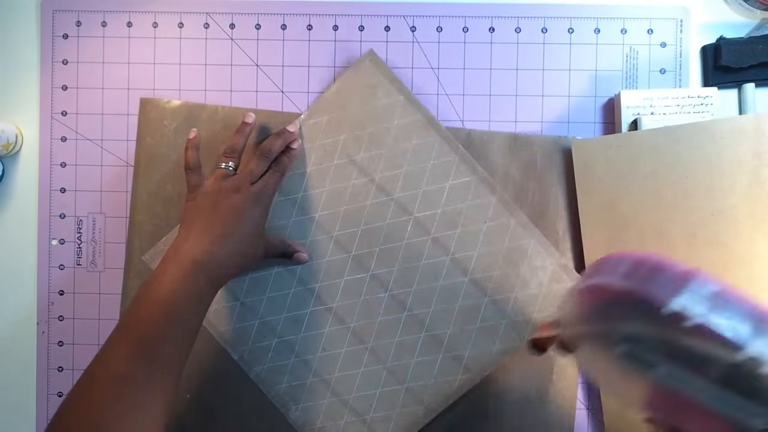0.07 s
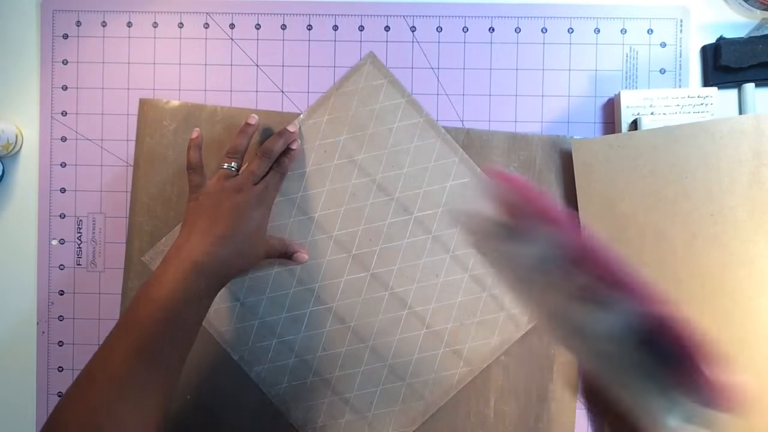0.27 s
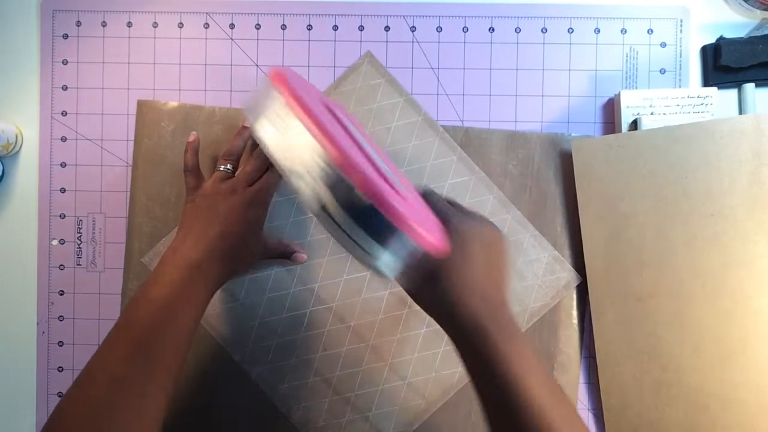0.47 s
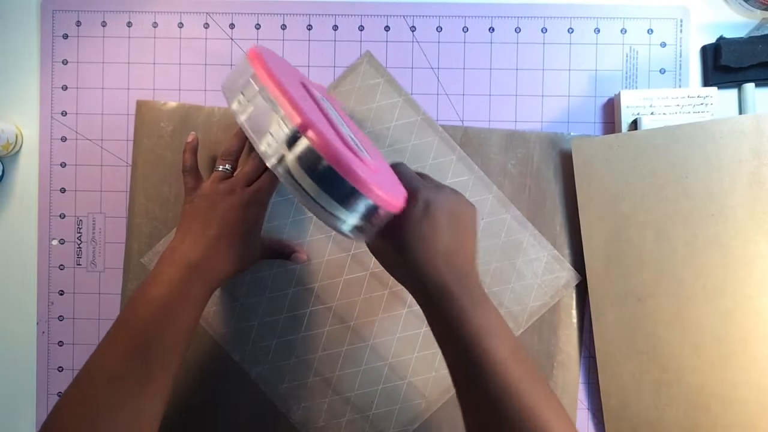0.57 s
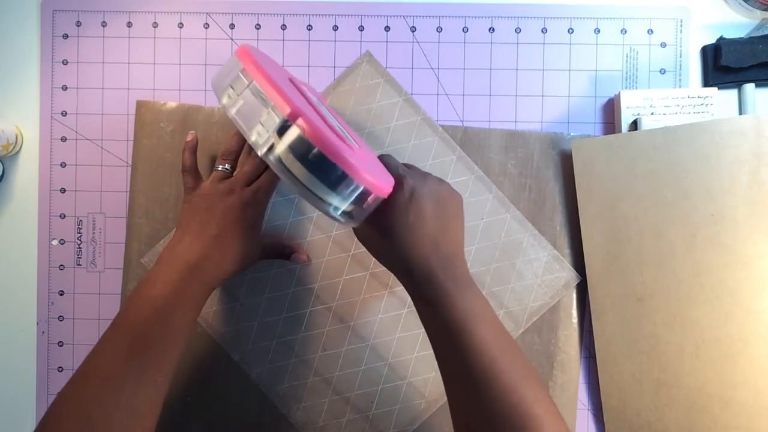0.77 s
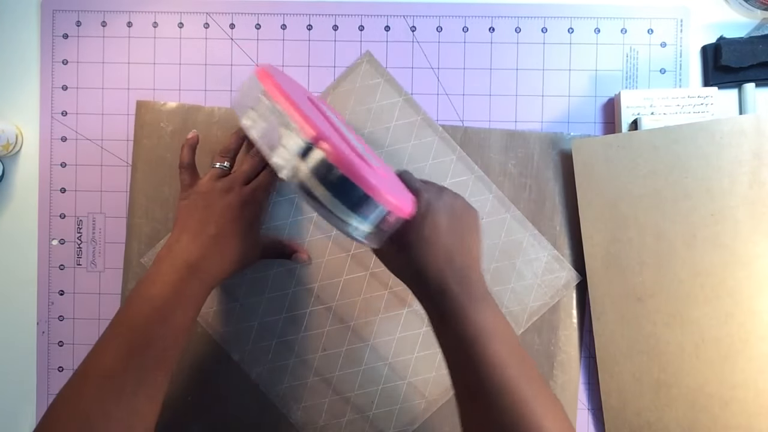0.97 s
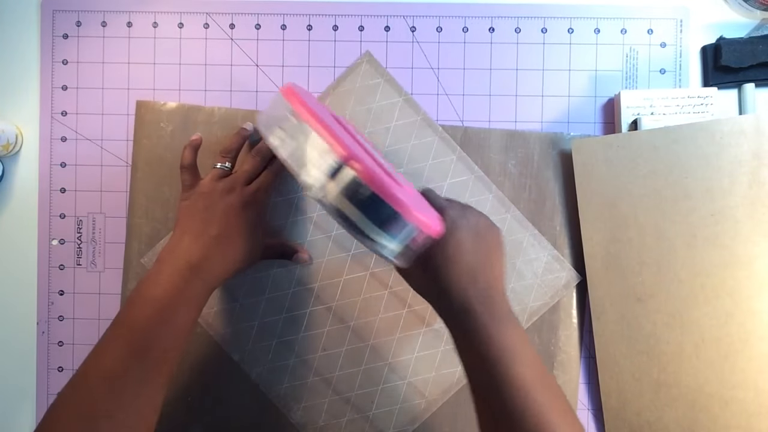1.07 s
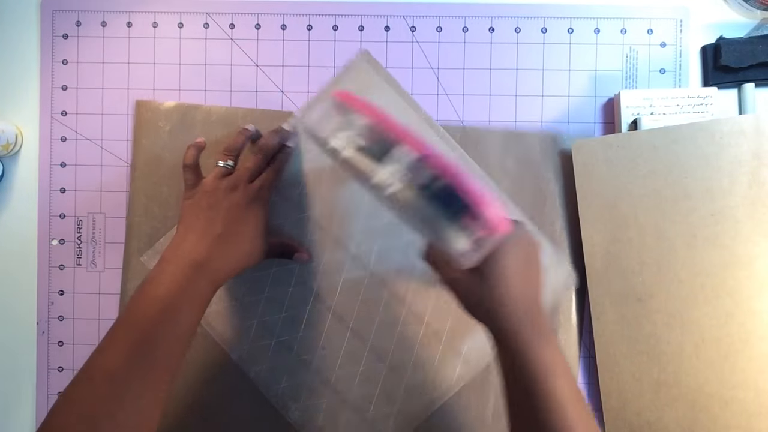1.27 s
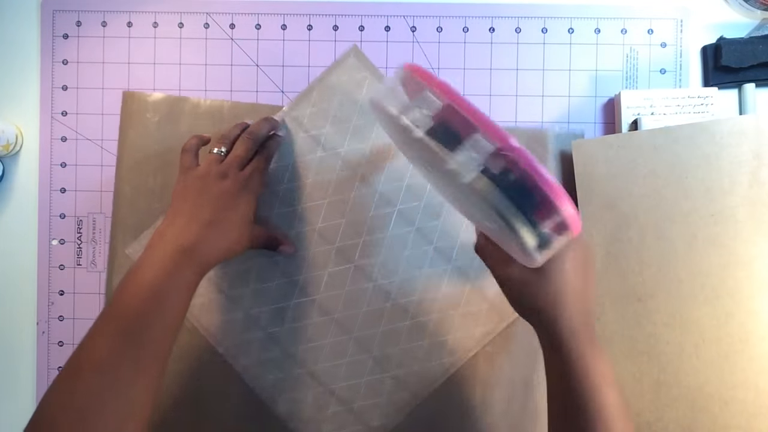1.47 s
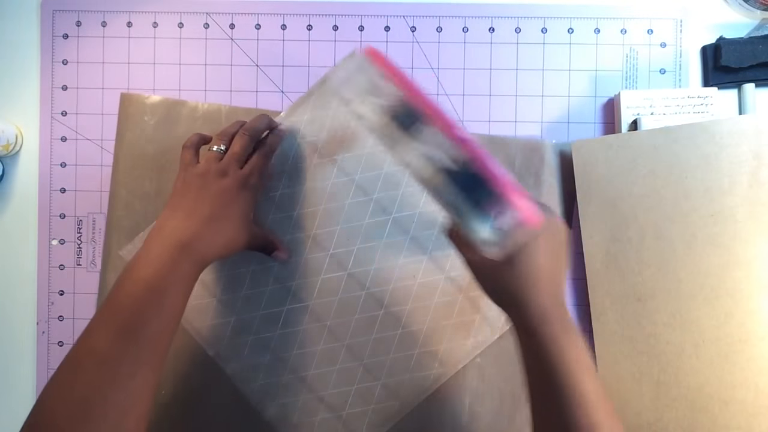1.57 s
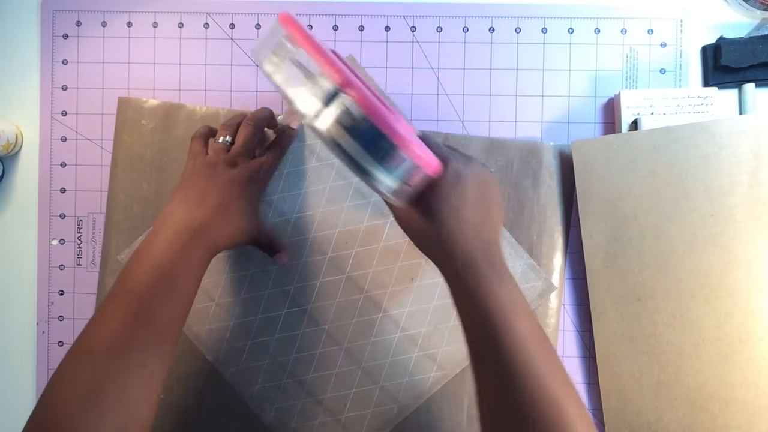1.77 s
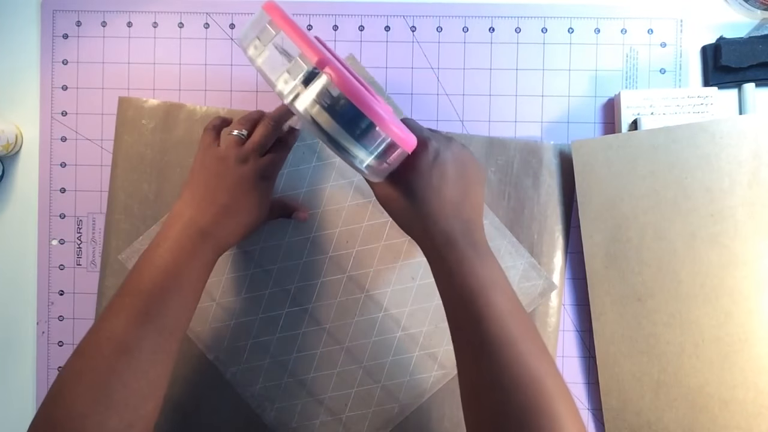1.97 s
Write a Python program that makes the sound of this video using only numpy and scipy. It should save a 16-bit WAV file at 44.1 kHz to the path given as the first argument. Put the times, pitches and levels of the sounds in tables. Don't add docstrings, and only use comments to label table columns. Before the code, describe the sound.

A handheld plastic tape runner gives one loud hollow clack, then smaller taps and a low knock on the mat, a soft papery scrape with faint tape hiss, and a sharp tick; close, small quiet room.

```python
import sys
import numpy as np
from scipy import signal
from scipy.fft import rfft, irfft
from scipy.io import wavfile
from scipy.ndimage import uniform_filter1d

SR = 44100
rng = np.random.default_rng(int(sys.argv[2]) if len(sys.argv) > 2 else 0)


def output_pcm(signal):
    pcm = np.clip(np.atleast_2d(signal).T, -1, 1) * 32767
    wavfile.write(sys.argv[1], SR, np.round(pcm).astype(np.int16))


def nominal_scale(level):
    x = np.asarray(level, float) / 20
    return 10 ** x


N = 89390


def unit(x):
    return x / np.sqrt(np.mean(x ** 2))


def on_log(hz, table):
    table = np.array(table, float)
    return np.interp(np.log(np.maximum(hz, 1)), np.log(table[:, 0]), table[:, 1])


def colour(x, table):
    hz = np.fft.rfftfreq(len(x), 1 / SR)
    return unit(irfft(rfft(x) * nominal_scale(on_log(hz, table)), len(x)))


def band(x, hz, width):
    return signal.lfilter(*signal.iirpeak(min(hz, SR / 2.2), hz / width, fs=SR), x)


def cut(x, hz, kind, order=4):
    sos = signal.butter(order, min(hz, SR / 2.2), kind, fs=SR, output="sos")
    return signal.sosfilt(sos, x)


def walk(rate):
    hold = int(SR / rate)
    steps = np.repeat(rng.standard_normal(N // hold + 1), hold)
    return unit(uniform_filter1d(steps, hold)[:N])


def grit(size, spread_db):
    return unit(rng.standard_normal(size) * nominal_scale(spread_db * rng.exponential(size=size)))


def add(out, at_s, x):
    i = max(int(at_s * SR), 0)
    out[i:i + len(x)] += x[:N - i]


def contacts(rows, shell_db, width=1.0, reach_up=2.86):
    # frequency in Hz, level in dB, 60 dB decay time in s.
    shell_modes = np.array([(235, -38, 0.14), (533, -12.5, 0.18), (706.6, -6, 0.16), (1132, -4.5, 0.032),
                            (1209, 1, 0.016), (1653.4, -5.5, 0.086), (2004, 0, 0.03), (2330, -15.5, 0.024),
                            (2460, -7.5, 0.043), (2892, -12, 0.17), (3644, -8, 0.062), (4220, 5.5, .035),
                            (4203, -13, 0.018), (6821, -20, .015)])
    mode_hz, mode_db, mode_t60 = shell_modes[:, 0], shell_modes[:, 1], shell_modes[:, 2:]
    mode_scatter_db, attack_share, grit_db = 0.5, 0.15, 2.2
    out, t = np.zeros(N), np.arange(SR // 4) / SR
    for at, db, hz, length, treble_db in rows:
        length = max(length, 2e-4)
        rise = (1 - np.exp(-t / (attack_share * length))) ** 2
        push = grit(len(t), grit_db) * rise * np.exp(-(t / length) ** 1.03)

        chance = rng.standard_normal((len(shell_modes), 3))
        f = mode_hz * (1 + 0.00088 * chance[:, 0])
        reach = 1 / (1 + ((f / hz - hz / f) / 2.08) ** 2)
        gains = reach * nominal_scale(mode_db + mode_scatter_db * chance[:, 1])
        waves = np.sin(2 * np.pi * (np.outer(f, t) + chance[:, 2:]))
        ring = gains @ (waves * np.exp(-np.log(1000) * t / mode_t60))

        body = 2.04 * band(push, hz, width * hz) + nominal_scale(shell_db) * ring * rise
        fizz = cut(cut(push, 4250, "high", order=2), 9500, "low", order=1)
        crack = cut(body, reach_up * hz, "low") + nominal_scale(treble_db) * fizz
        add(out, at, nominal_scale(db) * cut(crack, 181.3, "high", order=2))
    return out


def clacks():
    # start in seconds, level in dB, colour in Hz, chatter length in s, treble in dB.
    free_contacts = [(.012, -43, 776, 0.003, -28), (.0305, -43.5, 1860, 0.0058, -29),
                     (.1045, -47.5, 2550, 0.0046, -2), (.1135, -57, 2600, .003, 10),
                     (.134, -47, 2500, .008, 7), (.1300, -37, 1570, 0.0021, -8.5),
                     (.1415, -30.5, 1760, 0.014, -1), (.1768, -24.5, 2820, 0.0019, 2.5),
                     (.1795, -11.5, 1520, 0.007, -3.5), (.334, -54.5, 8100, 0.015, -5),
                     (.441, -42, 1680, 0.0072, -5), (.7072, -52.5, 895, 0.003, -22),
                     (.61, -73.5, 5000, 0.044, 11), (.807, -59.5, 1960, 0.053, -5.5)]
    return contacts(free_contacts, shell_db=-7)


def pressed():
    # start in seconds, level in dB, colour in Hz, chatter length in s, treble in dB.
    damped_contacts = [(.462, -36, 970, 0.0079, -25), (.470, -48, 1690, 0.012, -23),
                       (.482, -36, 797, 0.0088, -33), (.896, -41, 2300, 0.0034, -16),
                       (.905, -28.5, 1200, 0.012, -23), (.912, -45.5, 3700, 0.022, -7),
                       (.934, -32.5, 900, 0.011, -32), (.950, -46.5, 2170, 0.013, -36),
                       (.964, -31.5, 640, 0.007, -30), (1.162, -45.5, 2190, 0.012, -23),
                       (1.300, -44, 1200, 0.003, -24), (1.3202, -36, 780, 0.0067, -5),
                       (1.371, -46, 3100, 0.004, 4), (1.607, -51, 2700, 0.0015, -20),
                       (1.750, -41, 426, 0.018, -9), (1.852, -48, 1500, 0.024, -23),
                       (1.940, -47, 690, 0.016, -30)]
    return contacts(damped_contacts, shell_db=-11.0)


def hums():
    # start in seconds, level in
    # dB, frequency in Hz, length in s.
    brief_rings = [
        (.158, -43, 690, .022),
        (.1805, -24, 1140, .011),
        (.238, -42.5, 712, .036),
        (.334, -62, 9150, .04),
        (.334, -63, 10400, .035),
        (.4300, -42, 680, .018),
        (1.3205, -38.5, 1610, .008),
                   (0.1426, -36, 1390, 0.0077), (.148, -44, 1340, 0.0036), (0.143, -39, 6850, 0.0053),
             (.148, -44, 4400, .006), (.192, -39, 2930, .012), (0.191, -38.5, 248, 0.022),
             (0.183, -25.5, 740, 0.011), (.4428, -40.5, 1790, 0.0027), (0.442, -51.5, 4160, 0.0045),
             (.444, -47, 666, 0.018), (0.452, -55, 2280, .003), (.4622, -41, 756, 0.0024),
             (0.4634, -49, 690, .004), (0.461, -45, 1630, .005), (.4805, -40, 730, 0.0022),
             (0.4943, -41, 650, 0.0017), (0.901, -59, 4530, 0.0056), (0.908, -40, 1590, 0.0041),
             (.910, -38, 1050, 0.0063), (0.917, -45, 4570, .009), (0.93, -52, 5180, 0.0069),
             (0.917, -39, 954, 0.011), (.920, -45, 3420, 0.013), (.929, -42.5, 1900, 0.007),
             (.931, -38, 978, 0.012), (0.959, -43.5, 680, 0.0099), (1.114, -41.5, 1270, 0.005),
             (1.116, -47.5, 1766, 0.016), (1.168, -48, 1920, 0.0047), (1.194, -46, 1870, 0.0055),
             (1.198, -49, 610, 0.0078), (1.328, -49, 636, 0.0077), (1.384, -47, 620, .01),
             (1.399, -47.5, 1803, 0.015), (1.683, -37.5, 3150, .002), (1.694, -40.5, 3540, 0.0079),
             (.7075, -54, 668, 0.0067), (0.913, -43.5, 400, 0.0099), (0.018, -47, 740, 0.0062),
             (1.7085, -55, 3700, 0.002), (1.713, -47, 3440, 0.0016)]
    out = np.zeros(N)
    for at, db, hz, length in brief_rings:
        t = np.arange(int(length * 2 * SR)) / SR
        swell = 4 * t / length * np.exp(-3 * (t / length) ** 2)
        add(out, at, nominal_scale(db) * swell * np.sin(2 * np.pi * hz * t))
    return out * nominal_scale(2.5 * walk(150))


def snap():
    # start in seconds, level in dB, colour in Hz, chatter length in s, treble in dB.
    crackles = [
        (1.674, -46, 2970, 0.011, -17),
        (1.6848, -28.5, 4270, 0.0054, 7),
        (1.692, -33.5, 3450, 0.005, 6.5),
        (1.702, -42.5, 3560, 0.017, 10),
    ]
    tear_s, tear_db, tear_hz, tear_decay_s = 1.6844, -14.5, 3600, .00015
    out, t = contacts(crackles, shell_db=-25.0, width=0.51), np.arange(SR // 100) / SR
    tick = np.exp(-t / tear_decay_s) * np.cos(2 * np.pi * tear_hz * t)
    add(out, tear_s, nominal_scale(tear_db) * tick)
    return cut(out, 2800, "high")


def patchy(x):
    flicker_db, clump_rate = 1.3, 60
    hz, spec = np.fft.rfftfreq(N, 1 / SR), rfft(x)
    part = np.floor(1.5 * np.log2(np.maximum(hz, 100) / 100))
    common = walk(clump_rate)
    out = np.zeros(N)
    for k in np.unique(part):
        swell = nominal_scale(flicker_db * (walk(clump_rate) + 0.89 * common))
        out += irfft(spec * (part == k), N) * swell
    return unit(out)


def scrape():
    # time in seconds, level in dB, lightness from 0 to 1, tape hiss in dB.
    roller = [(.98, -79, 0, -76), (1.031, -59, 0, -78), (1.076, -50.5, 0, -57), (1.12, -49, 0, -61.5),
              (1.146, -50, 0.05, -59.5), (1.174, -47.5, 0.13, -60), (1.22, -54.5, 0, -58),
              (1.26, -56.5, 0, -59.5), (1.29, -58, 0.13, -67), (1.336, -47.5, 0.03, -66),
              (1.362, -54.5, 0.02, -66), (1.408, -48.5, 0.82, -58), (1.46, -56, 0.96, -65),
              (1.54, -56, 0.95, -69), (1.62, -53, 0.97, -61), (1.675, -57.5, 0.93, -69),
              (1.72, -59, 0.27, -63), (1.8, -84, 0.3, -73)]
    # time in seconds, level in dB.
    shuffle = [
        (0, -57.5),
        (.04, -54),
        (.1, -62),
        (.4, -60),
        (.6, -69.5),
        (1.699, -97.5),
        (1.8, -61),
        (2.03, -71),
    ]
    # frequency in Hz, level in dB per Hz.
    firm_spectrum = [(150, -2.5), (300, -4), (540, 1.5), (1200, -5.5), (1900, -6), (3500, -12),
                     (6000, -19.5), (15500, -32.5)]
    light_spectrum = [(150, -44), (400, -47), (1000, -26.5), (1800, -9), (2700, -7), (4500, -13.5),
                      (8000, -20.5), (15500, -38)]
    tape_spectrum = [(1500, -30), (4000, -23.5), (8000, -6.5), (13000, -7), (15500, -11.5)]
    t = np.arange(N) / SR
    drag_s, drag_db, lightness, hiss_db = np.array(roller).T
    hand_s, hand_db = np.array(shuffle).T

    def grains(spectrum):
        return colour(grit(N, 1.6), spectrum)

    def drag_level(db):
        return nominal_scale(np.interp(t, drag_s, db, left=-120, right=-120))

    heavy, thin = grains(firm_spectrum), grains(light_spectrum)
    rub, hiss = grains(firm_spectrum), grains(tape_spectrum)
    light = np.clip(np.interp(t, drag_s, lightness), 0, 1)
    paper = patchy(np.sqrt(1 - light) * heavy + np.sqrt(light) * thin)
    hand = patchy(rub) + 0.17 * hiss[::-1]
    hand_level = nominal_scale(np.interp(t, hand_s, hand_db))
    return drag_level(drag_db) * paper + drag_level(hiss_db) * hiss + hand_level * hand


def desk():
    # centre in seconds, peak level in dB, frequency in Hz, width in s.
    thumps = [(.02, -54, 170, .012), (.2, -50, 240, .012), (.39, -53, 72, .012), (.485, -53, 240, .007),
              (.505, -54, 220, .006), (.565, -49, 95, .006), (.589, -49, 90, .005), (.623, -51, 95, .007),
              (.672, -51, 80, .012), (.713, -45, 95, .006), (.755, -48, 95, .007), (.782, -52, 100, .005),
              (.818, -46, 100, .006), (.846, -50, 100, .007), (.9031, -22, 110, .0051),
              (.926, -38, 120, .006), (.922, -48, 300, .005), (.955, -44, 90, .008), (.962, -45, 42, .025),
              (.5, -58, 65, .025), (.36, -56, 170, .01), (.995, -46, 120, .006), (1.085, -50, 125, .01),
              (1.345, -54, 46, .025), (1.37, -56, 230, .008), (1.39, -53, 110, .01), (1.765, -51, 88, .01),
              (1.855, -53, 78, .01), (1.99, -54, 110, .01)]
    out, t = np.zeros(N), np.arange(N) / SR
    for at, db, hz, wide in thumps:
        swell = np.exp(-.5 * ((t - at) / wide) ** 2)
        out -= nominal_scale(db) * swell * np.sin(2 * np.pi * hz * (t - at) + 1.1)
    return out


def room(x):
    # frequency in Hz, 60 dB decay time in s.
    decay = [(200, 0.46), (1000, 0.23), (4000, 0.43), (12000, 0.29)]
    gap_s = 0.0087
    t = np.arange(SR // 2) / SR
    tail = np.zeros(len(t))
    for hz in 125 * 2. ** np.arange(8):
        octave = unit(band(rng.standard_normal(len(t)), hz, hz / 0.79))
        tail += octave * np.sqrt(hz) * np.exp(-np.log(1000) * t / on_log(hz, decay))
    tail = tail * (1 - np.exp(-(t / gap_s) ** 2))
    return signal.fftconvolve(x, tail / np.sqrt(np.sum(tail ** 2)))[:N]


def room_air():
    # frequency in Hz, level in dB per Hz.
    air_spectrum = [(12, -75), (20, -16), (49, -10), (90, -8.5), (260, -6.5), (480, -22.5), (686, -26.5),
                    (12400, -40), (15500, -43)]
    return nominal_scale(-62.5) * colour(rng.standard_normal(N), air_spectrum) * nominal_scale(1.6 * walk(6.64))


def scene():
    near = clacks() + pressed() + scrape()
    rings, tear = hums(), snap()
    to_room = nominal_scale(-7.5) * near + nominal_scale(-18) * rings + nominal_scale(-13) * tear
    return (near + rings + tear + room(to_room) + desk() + room_air())[None]


def band_limit(x):
    return signal.sosfilt(signal.butter(12, 15710, fs=SR, output="sos"), x)


def record(dry):
    top = signal.ellip(10, .3, 85, 15300, fs=SR, output="sos")
    mix = signal.sosfilt(top, dry)
    return band_limit(mix)


dry = scene()
out = record(dry)
output_pcm(out)
```